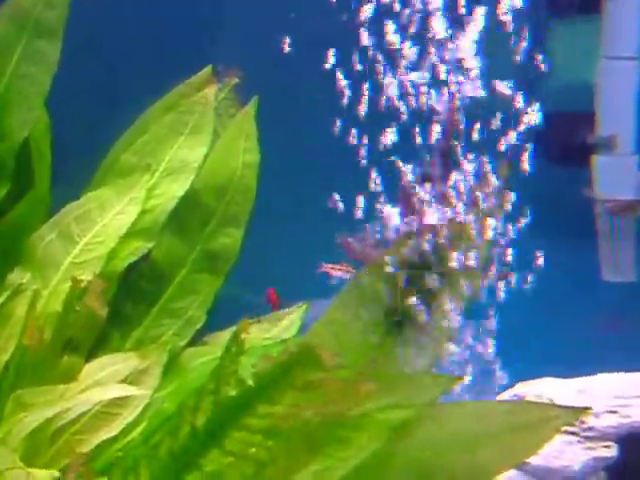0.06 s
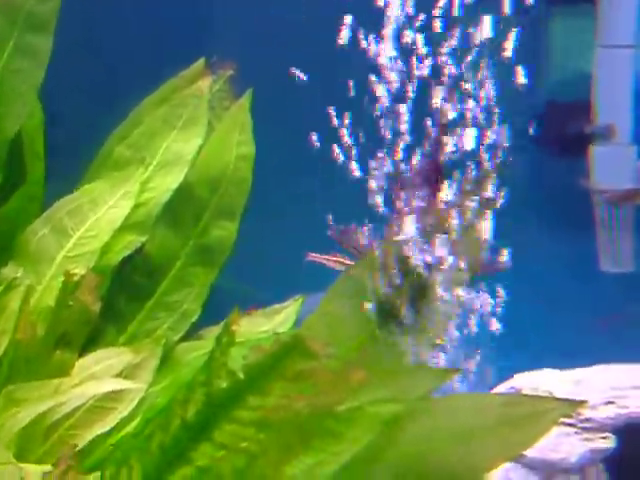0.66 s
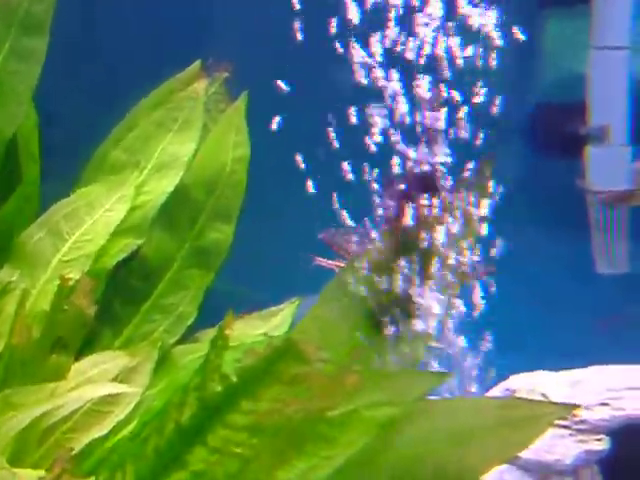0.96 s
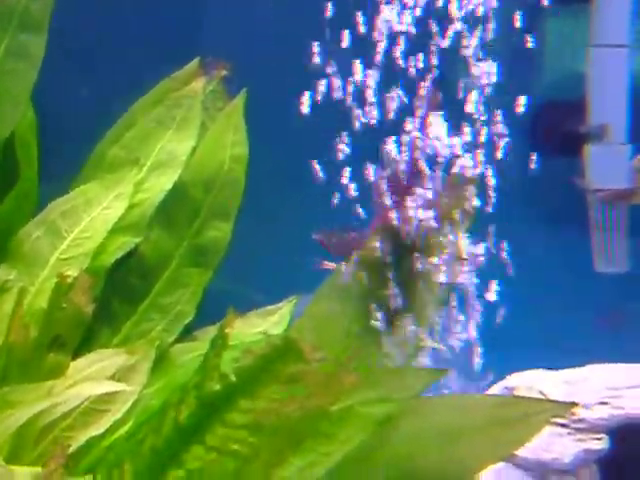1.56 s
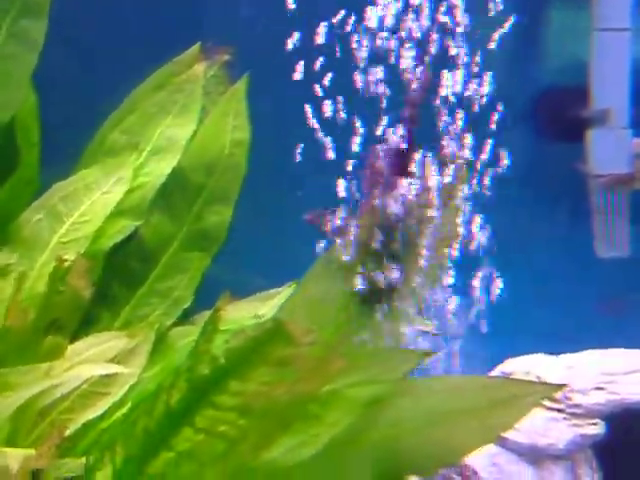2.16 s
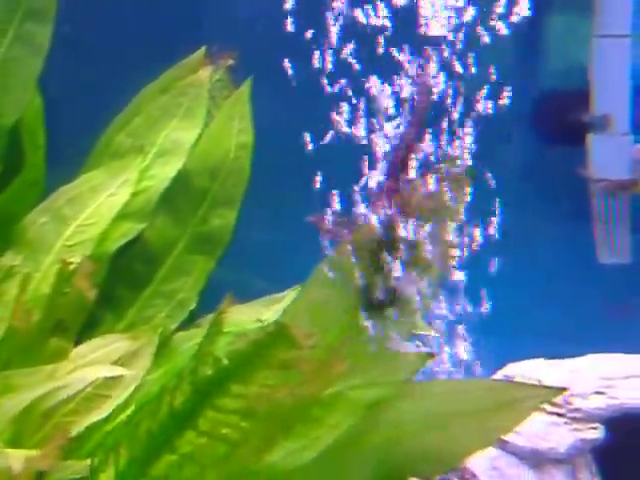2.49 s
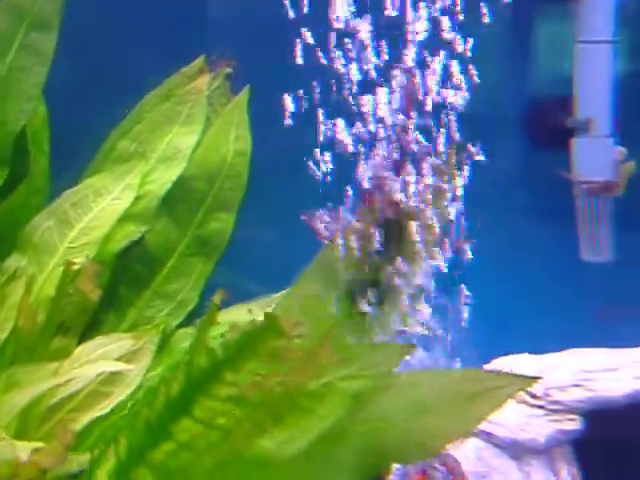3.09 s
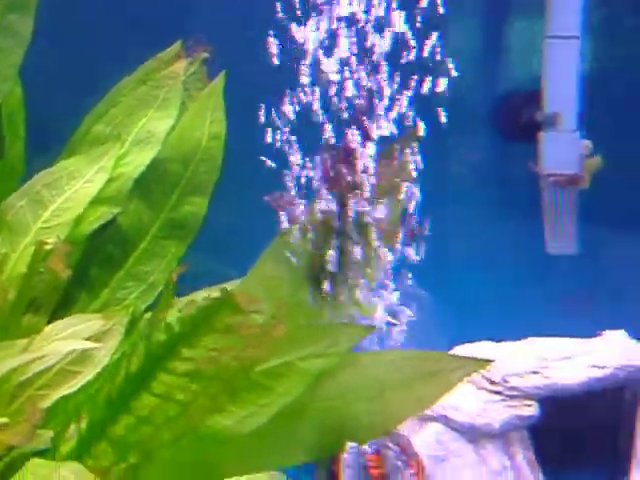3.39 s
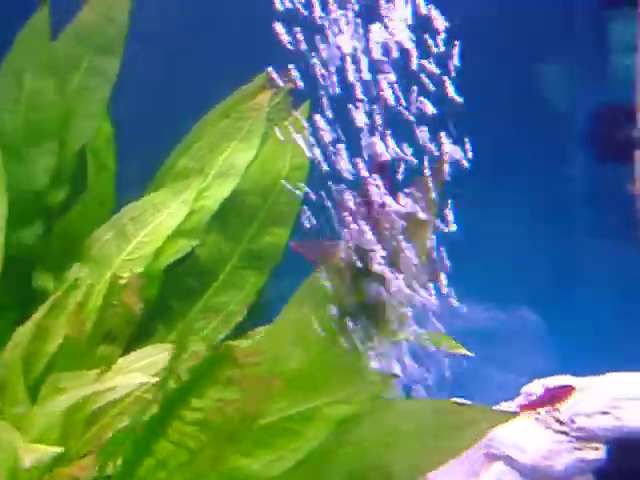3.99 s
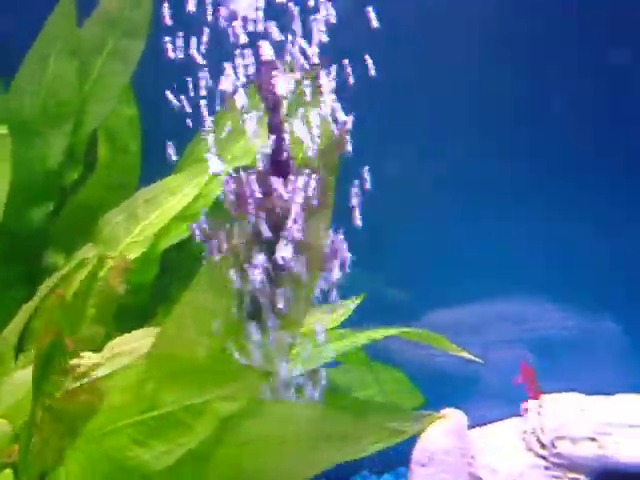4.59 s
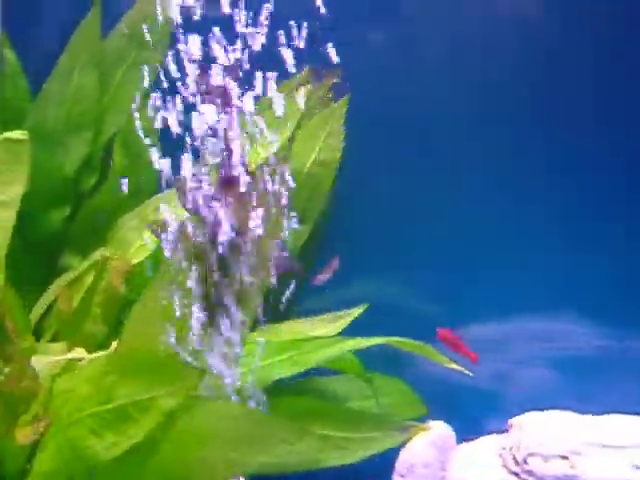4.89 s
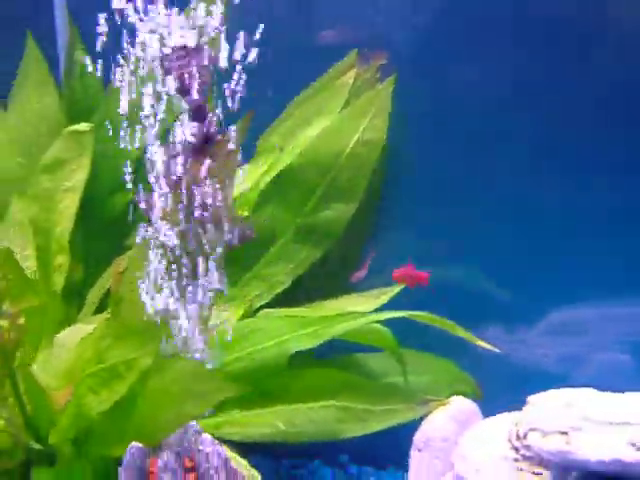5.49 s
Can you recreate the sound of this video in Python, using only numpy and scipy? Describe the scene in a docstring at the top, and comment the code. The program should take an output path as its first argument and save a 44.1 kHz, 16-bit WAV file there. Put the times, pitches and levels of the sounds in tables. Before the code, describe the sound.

A small air pump hums steadily beside a home aquarium, with a thin motor whine, softly fizzing bubbles and a low murmur of water. About halfway through come a couple of light clicks, then one sharp knock that rings briefly. The hum shifts in tone as the close, hand-held microphone drifts along the tank, and several dull bumps follow near the end. An even hiss lies under everything.

```python
"""An aquarium air pump hums on multiples of the mains frequency, beside a thin motor whine.
A column of small bubbles fizzes softly, each a tiny rising ping, over the murmur of water and tank.
A hand-held camera drifts along the tank, so the hum changes colour; it clicks, knocks once on something
that rings, and bumps dully in the hand. Its electronics add hiss, sizzle and a faint high whistle."""
import sys
import numpy as np
from scipy import signal
from scipy.fft import rfft, irfft, next_fast_len
from scipy.io import wavfile
from scipy.ndimage import map_coordinates

SR = 44100
rng = np.random.default_rng(int(sys.argv[2]) if len(sys.argv) > 2 else 0)


def dump(signal):
    """Clip the signal to [-1, 1] and save it as 16-bit WAV at the path in sys.argv[1]."""
    limited = np.clip(np.atleast_2d(signal).T, -1, 1)
    pcm = np.round(limited * 32767).astype(np.int16)
    wavfile.write(sys.argv[1], SR, pcm)


N = 249158
TIME_S = np.arange(N) / SR
MAINS_HZ, BAND_LIMIT_HZ = 60.03, 9195


def amp(db):
    """Decibels to gain."""
    return 10 ** (np.asarray(db) / 20)


def unit(x):
    """x at rms 1."""
    return x / np.sqrt(np.mean(x ** 2) + 1e-20)


def eq_gain(points, hz):
    """Gain at hz of an EQ curve drawn through (freq_hz, level_db) points on a log axis."""
    freq_hz, level_db = np.transpose(points)
    return amp(np.interp(np.log(hz + 1), np.log(freq_hz + 1), level_db))


def automation(rows):
    """(time_s, value) breakpoints as one value per sample."""
    return np.interp(TIME_S, *np.transpose(rows))


def wobble(rate_hz):
    """A smooth random curve with rate_hz knots a second."""
    position = np.linspace(0, N / SR * rate_hz, num=2048)
    coarse = map_coordinates(rng.standard_normal(256), [position], mode="wrap")
    return np.interp(np.linspace(0, position[-1], N), position, coarse)


def filtered(x, response):
    """x shaped by a frequency response."""
    size = next_fast_len(N + SR // 2)
    return irfft(rfft(x, size) * response(np.fft.rfftfreq(size, 1 / SR)), size)[:N]


def bandpass(x, low_hz, high_hz):
    """x with lows and highs rolled off."""
    return signal.sosfilt(signal.butter(2, [low_hz, high_hz], "band", fs=SR, output="sos"), x)


def noise(response):
    """Coloured noise of rms 1."""
    return unit(filtered(rng.standard_normal(N), response))


def tone(cycles):
    """A sine of rms 1 that follows a count of cycles, from a random phase."""
    return np.sqrt(2) * np.sin(2 * np.pi * (cycles + rng.random()))


def fade(t, t60):
    """A free decay, 60 dB down at t60."""
    return np.exp(-np.log(1000) * t / t60)


def crack(low_hz, high_hz, t60_s):
    """A fast-dying burst of noise in one band, with the same energy at any bandwidth."""
    decay = fade(np.arange(SR // 16) / SR, t60_s)
    burst = bandpass(decay * rng.standard_normal(len(decay)), low_hz, high_hz)
    return burst * np.linalg.norm(decay) / np.linalg.norm(burst)


def add(track, start_s, sound):
    """Mix a sound into the track at start_s."""
    part = track[round(start_s * SR):][:len(sound)]
    part += sound[:len(part)]


# Tone colour of the noise floor: freq_hz, relative_db
HISS_EQ = [(200, -16.5), (1500, -4), (3500, 2.5), (5200, 1.5), (7000, 2), (9000, -5.5)]


def hiss(level_db=-52):
    """The microphone's amplifier lays down an even bed of hiss."""
    return amp(level_db) * noise(lambda hz: eq_gain(HISS_EQ, hz))


def sizzle(level_db=-58, rate_hz=302, scatter_db=5, low_hz=6000, jitter_s=0.00023):
    """The camera's circuits leak a fast train of tiny, uneven ticks into the hiss."""
    beats_s = np.arange(1, N / SR * rate_hz - 1) / rate_hz
    lateness, size = rng.standard_normal((len(beats_s), 2)).T
    starts = np.clip((beats_s + jitter_s * lateness) * SR, 0, N - 1).astype(int)
    ticks = np.bincount(starts, amp(scatter_db * np.minimum(size, 2)), N)
    return amp(level_db) * unit(bandpass(ticks, low_hz, BAND_LIMIT_HZ))


# Thin electronic tones: pitch_hz, level_db
WHISTLE_TONES = [(1157, -68), (6541, -76), (6901, -75), (7090, -74), (7397, -73), (7450, -69.5),
                 (7752, -74)]


def whistle():
    """The camera's electronics hold a faint, steady cluster of sines."""
    return sum(amp(level_db) * tone(pitch_hz * TIME_S) for pitch_hz, level_db in WHISTLE_TONES)


# Dark wash of room and water: freq_hz, relative_db
MURMUR_EQ = [(10, -23.5), (22, -4.5), (45, -14.5), (80, -12), (150, 1), (210, 0), (330, -2.5), (450, -4.5),
             (750, -9.5), (1400, -8), (2200, -13), (4000, -21), (9000, -48)]
# Hollow resonances of tank and stand: centre_hz, width_hz, relative_db
TANK_MODES = [(118.4, 24.4, 0), (288.5, 37.5, 1.5), (552, 30, -2.5)]
# The camera's move along the tank: time_s, position (0 = first spot, 1 = last spot)
CAMERA_PATH = [(0, 0), (3.0, 0.052), (4.15, 0.29), (4.55, 0.63), (5, 1), (5.65, 1.04)]


def water(murmur_db=-51.5, swell_db=0.54, tank_db=-54.0, nearer_db=0.5):
    """Rising air churns the water, and the tank booms faintly with it."""
    def tank_response(hz):
        return sum(amp(db) * 1j * hz * width_hz / (centre_hz ** 2 - hz ** 2 + 1j * hz * width_hz)
                   for centre_hz, width_hz, db in TANK_MODES)

    murmur = amp(murmur_db + swell_db * wobble(rate_hz=10)) * noise(lambda hz: eq_gain(MURMUR_EQ, hz))
    boom = amp(tank_db + nearer_db * automation(CAMERA_PATH)) * noise(tank_response)
    return murmur + boom


# Light, dry handling clicks: start_s, level_db, cutoff_hz
CLICK_CUES = [(2.636, -27.7, 3300), (3.2699, -31, 9000), (3.3832, -40, 7100), (5.444, -39.5, 3000)]
# The colour they share: centre_hz, relative_db
CLICK_COLOUR = [(630, -4), (1120, -7.5), (1800, -1.5), (2900, 2), (4200, 4), (6600, 3)]


def clicks(t60_at_1khz_s=0.022, damping=0.58, log_half_width=0.19):
    """Each contact is a brief crack; a soft one lacks the top, and the treble dies first."""
    out = np.zeros(N)
    edge_ratio = np.exp(log_half_width)
    for start_s, level_db, cutoff_hz in CLICK_CUES:
        for hz, band_db in CLICK_COLOUR:
            t60_s = t60_at_1khz_s * (1000 / hz) ** damping
            gain = amp(level_db + band_db) / np.hypot(1, (hz / cutoff_hz) ** 6)  # steep low-pass
            add(out, start_s, gain * crack(hz / edge_ratio, hz * edge_ratio, t60_s))
    return out


# Dull bumps and plops: start_s, level_db, pitch_hz, t60_s
BUMP_CUES = [(3.3995, -24, 265, 0.028), (4.749, -36.5, 540, 0.08), (4.8111, -24, 300, 0.019),
             (5.138, -42, 95, 0.086), (5.446, -35.5, 325, 0.069), (5.454, -27, 166, 0.04),
             (5.563, -30.5, 167, 0.041), (5.629, -37, 141, .07)]


def bumps(attack_s=0.0011):
    """Each dull bump or bubble plop swells into a single low, fading tone."""
    out, t = np.zeros(N), TIME_S[:SR // 2]
    for start_s, level_db, pitch_hz, t60_s in BUMP_CUES:
        envelope = (1 - np.exp(-t / attack_s)) * fade(t, t60_s)
        add(out, start_s, amp(level_db) * envelope * np.sin(2 * np.pi * pitch_hz * t))
    return out


# The one hard hit: start_s, level_db, low_cut_hz, high_cut_hz
KNOCK_CUE = (3.3998, -26.5, 439, 2498)
# Its ringing tail: pitch_hz, relative_db, t60_s
KNOCK_MODES = [(643.5, 1.8, 0.27), (680, 3.5, 0.05), (1162, -3.5, 0.16), (1265, 8.5, 0.032),
               (1400, 7.5, .028), (1565, 2.5, 0.05), (2026, 8.5, 0.082)]
# Its chatter, one row per contact: start_s, level_db
KNOCK_SNAPS = [(3.3996, -12.5), (3.4025, -10.5), (3.4069, -17), (3.409, -19.5)]


def knock(clack_db=-17.5):
    """A hard blow lands with a clack, sets the struck body ringing and rebounds in bright snaps."""
    out, t = np.zeros(N), TIME_S[:SR // 2]
    start_s, level_db, low_cut_hz, high_cut_hz = KNOCK_CUE
    ring = sum(amp(level_db + db) * fade(t, t60_s) * np.sin(2 * np.pi * pitch_hz * t)
               for pitch_hz, db, t60_s in KNOCK_MODES)
    # a small body radiates little bass, and the contact time blunts the top
    add(out, start_s, bandpass(ring, low_cut_hz, high_cut_hz))
    add(out, start_s, amp(clack_db) * crack(low_hz=1100, high_hz=1900, t60_s=0.024))
    for snap_s, snap_db in KNOCK_SNAPS:
        add(out, snap_s, amp(snap_db) * crack(low_hz=4700, high_hz=8300, t60_s=0.0051))
    return out


def bubbles(level_db=-59, count=2200, centre_hz=1500, log_spread=0.608, t60_cycles=28, scatter_db=3.0):
    """Each bubble rings briefly and rises in pitch as it reaches the surface."""
    starts = rng.integers(N, size=(count, 1))
    pitch_hz = np.clip(centre_hz * np.exp(log_spread * rng.standard_normal((count, 1))), 350, 7000)
    gain = amp(scatter_db * np.minimum(rng.exponential(size=(count, 1)), np.pi))
    steps = np.arange(SR // 40)
    cycles = pitch_hz * steps / SR
    envelope = (1 - np.exp(-cycles)) * fade(cycles, t60_cycles)
    rising_cycles = cycles * (1 + 0.132 * cycles / t60_cycles)
    pings = gain * envelope * np.sin(2 * np.pi * rising_cycles)
    fizz = np.bincount((starts + steps).ravel(), pings.ravel(), N)[:N]
    return amp(level_db) * unit(fizz)


# Slow upward glide of the motor: time_s, pitch_hz
MOTOR_GLIDE = [(0, 852.2), (1.5, 852.6), (3.2, 853.6), (4.3, 854.7), (5.65, 855.2)]
# Partials of its whine: harmonic, level_db
MOTOR_PARTIALS = [(1, -58.5), (3, -70)]


def motor_whine(waver_db=1.0):
    """A small motor creeps up in speed, its thin whine wavering in level."""
    cycles = np.cumsum(automation(MOTOR_GLIDE)) / SR
    return sum(amp(level_db + waver_db * wobble(rate_hz=9.6)) * tone(harmonic * cycles)
               for harmonic, level_db in MOTOR_PARTIALS)


# Body of the hum at the first spot, and its change by the last: harmonic, level_db, change_db
PUMP_HARMONICS = [(1, -66.5, 3), (2, -62, 3), (4, -48.8, 0.6), (5, -59.5, -4.5), (6, -54.4, -3),
                  (7, -68, 2.5), (8, -71, 11.5), (9, -58.5, -3.5), (10, -69.5, 3.5), (12, -67, -5),
                  (13, -69, -10), (14, -68.5, -7), (20, -67, -12), (25, -68, -3)]
# Fader moves for two neighbouring harmonics that sing out of the buzz: time_s, lower_db, upper_db
SINGING_LEVELS = [(0, -58.7, -78), (2.9, -58.5, -78), (4.0, -66, -69), (4.5, -62, -60.5),
                  (4.95, -58.5, -61), (5.65, -66, -67)]


def air_pump(waver_db=0.6, singing=(26, 27), buzz_db=-67.5, fall_db_per_octave=2.5, scatter_db=3.5):
    """The diaphragm buzzes on mains harmonics; standing waves swell or thin them as the camera drifts."""
    cycles, position = MAINS_HZ * TIME_S, automation(CAMERA_PATH)
    hum = np.zeros(N)
    for harmonic, level_db, change_db in PUMP_HARMONICS:
        gain = amp(level_db + change_db * position + waver_db * wobble(rate_hz=5.7))
        hum += gain * tone(harmonic * cycles)
    for column, harmonic in enumerate(singing, start=1):
        fader_db = automation([(row[0], row[column]) for row in SINGING_LEVELS])
        hum += amp(fader_db) * tone(harmonic * cycles)
    # weak, steady harmonics fill in the buzz between and above the strong ones
    strong = [row[0] for row in PUMP_HARMONICS] + list(singing)
    for harmonic in np.setdiff1d(np.arange(1, 50), strong):
        level_db = buzz_db - fall_db_per_octave * np.log2(harmonic) + scatter_db * rng.standard_normal()
        hum += amp(level_db) * tone(harmonic * cycles)
    return hum


def scene():
    """The mono mix at one close microphone."""
    bed = air_pump() + motor_whine() + whistle() + water() + bubbles() + hiss() + sizzle()
    return (bed + clicks() + knock() + bumps())[None]


# Top-end roll-off of the microphone: freq_hz, gain_db
MIC_EQ = [(7500, 0), (8000, -2.5), (8400, -9), (8700, -18), (8950, -33), (9200, -41.5)]


def record(dry):
    """The camera rolls off the treble and keeps nothing above its band limit."""
    return filtered(dry[0], lambda hz: eq_gain(MIC_EQ, hz) * (hz < BAND_LIMIT_HZ))[None]


dry = scene()
out = record(dry)
dump(out)
```